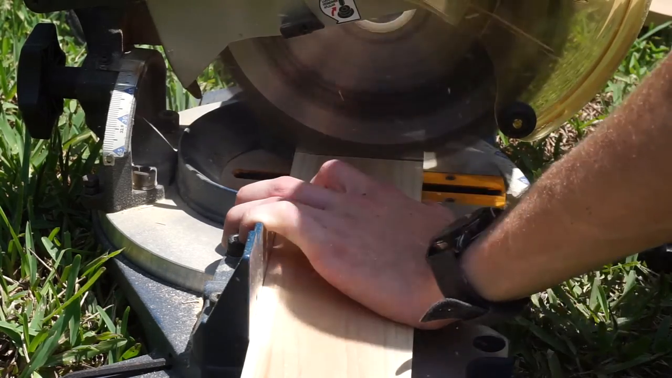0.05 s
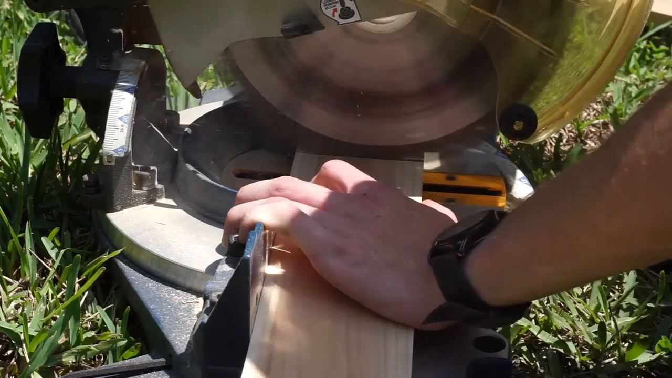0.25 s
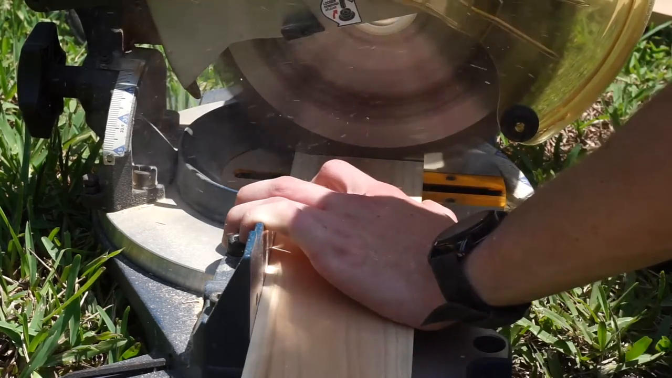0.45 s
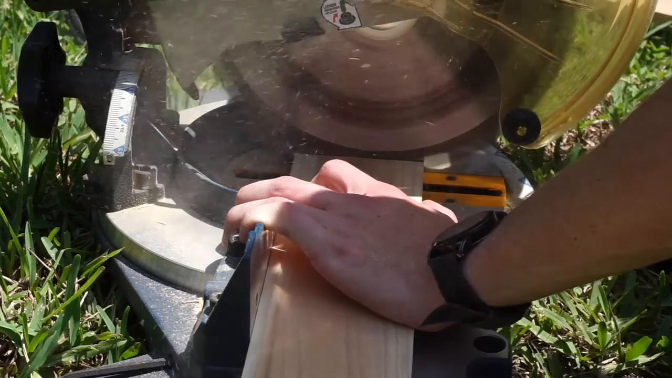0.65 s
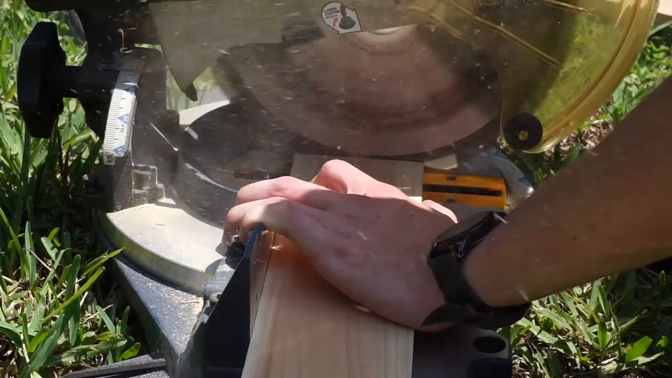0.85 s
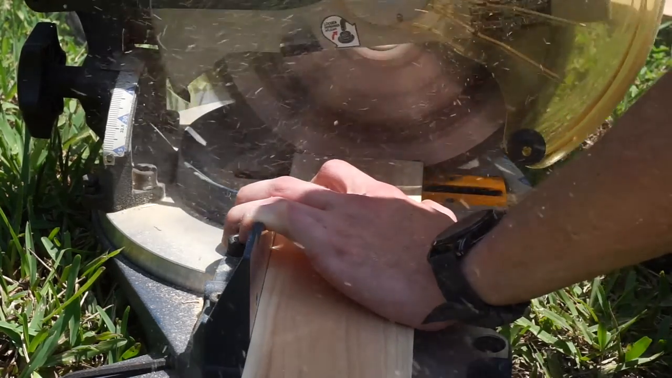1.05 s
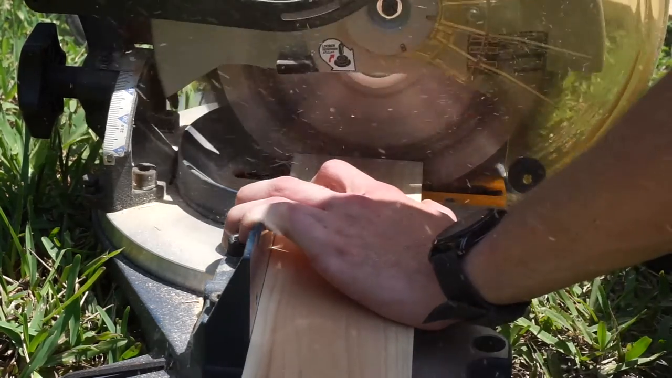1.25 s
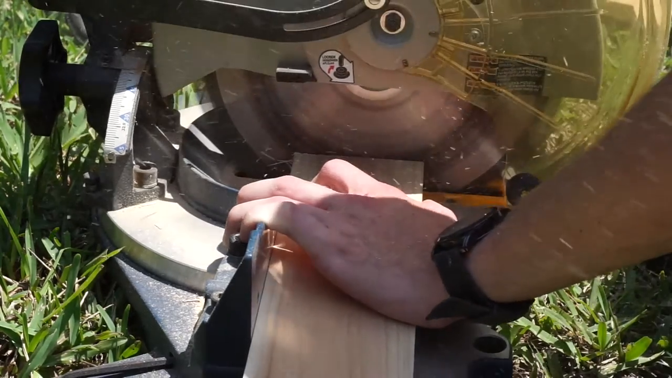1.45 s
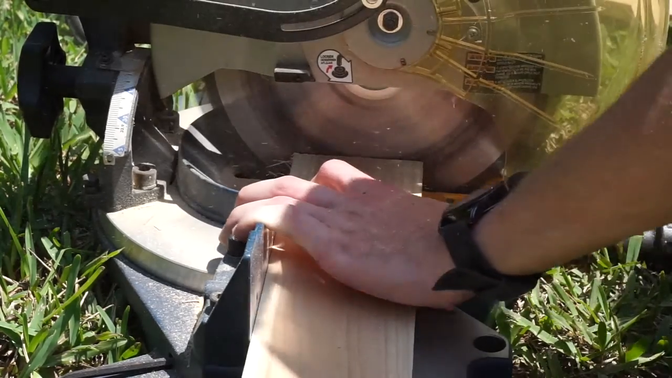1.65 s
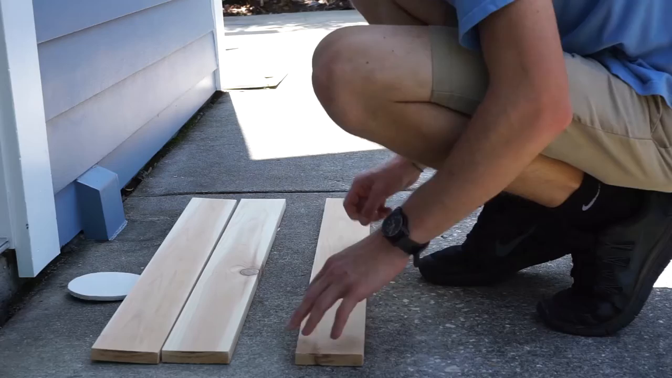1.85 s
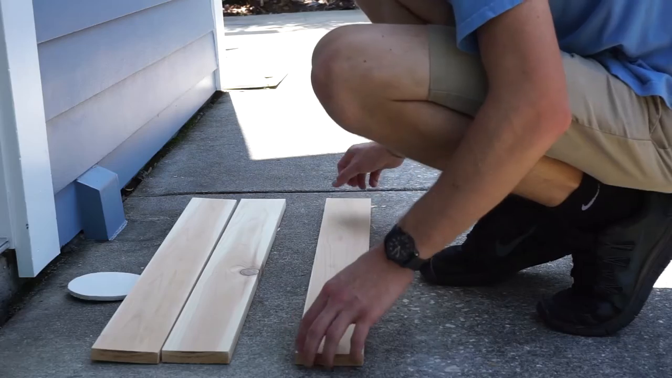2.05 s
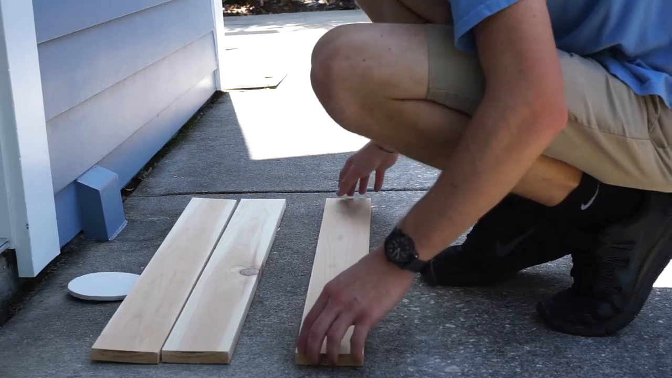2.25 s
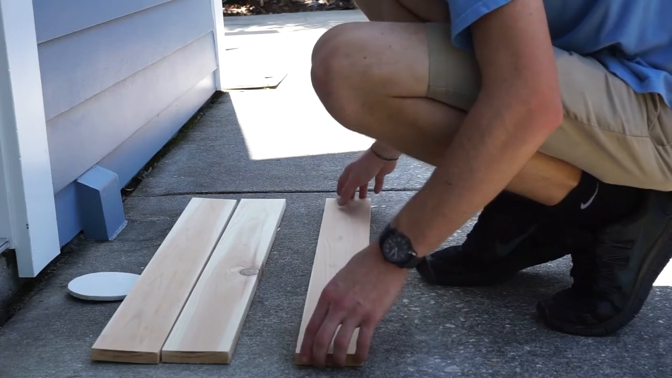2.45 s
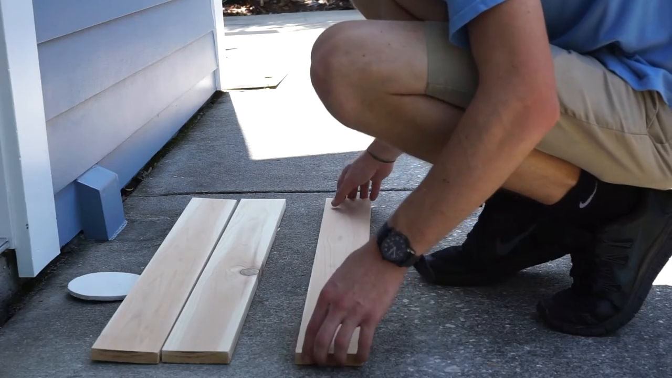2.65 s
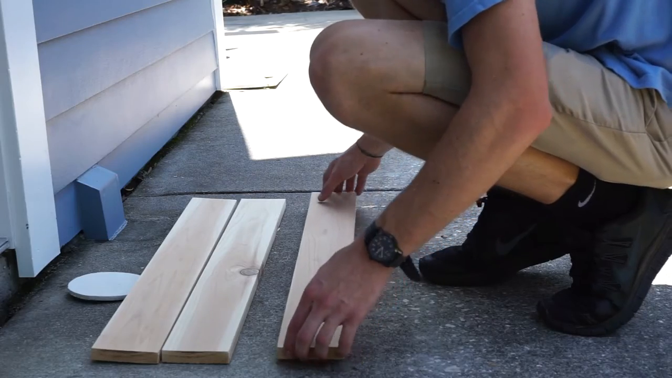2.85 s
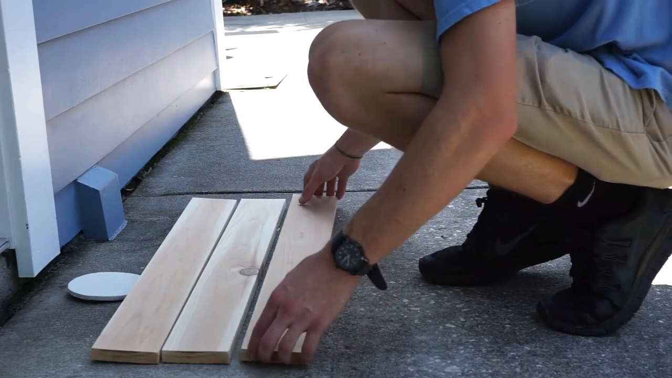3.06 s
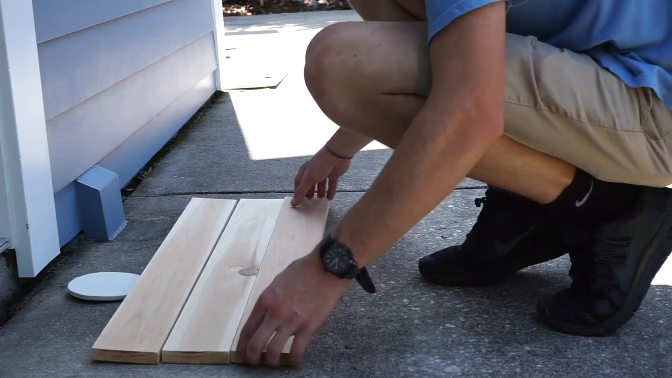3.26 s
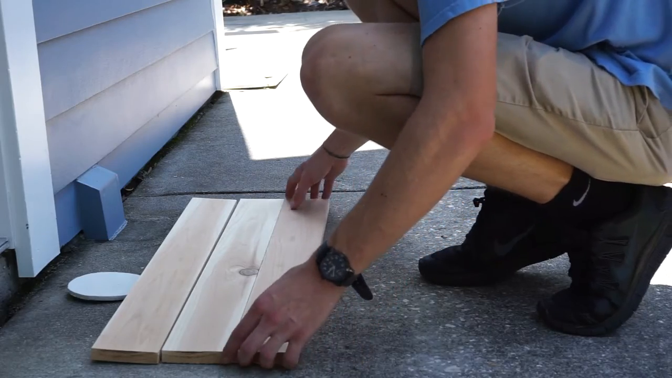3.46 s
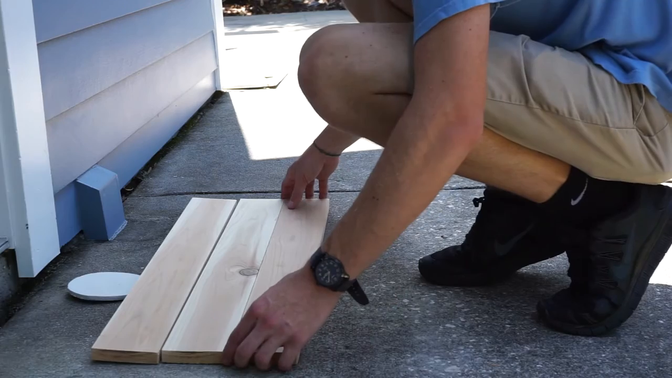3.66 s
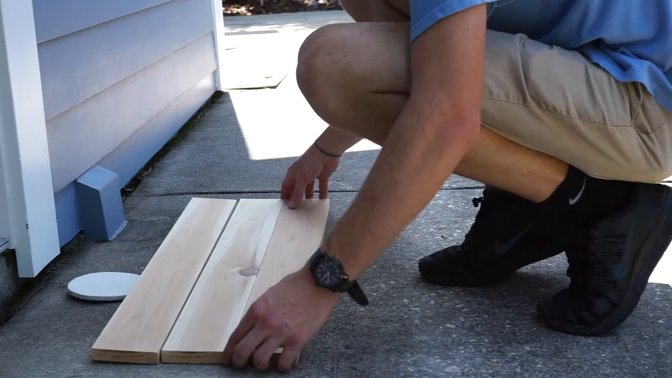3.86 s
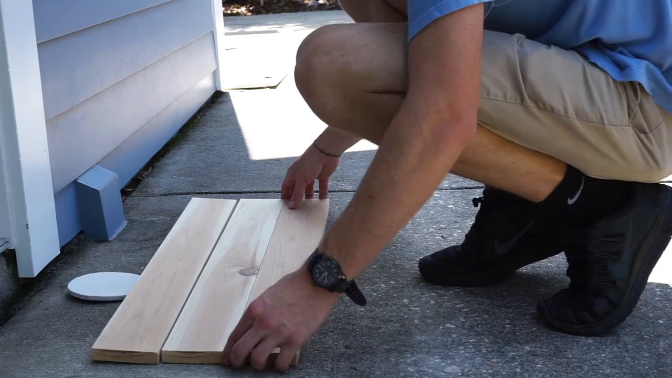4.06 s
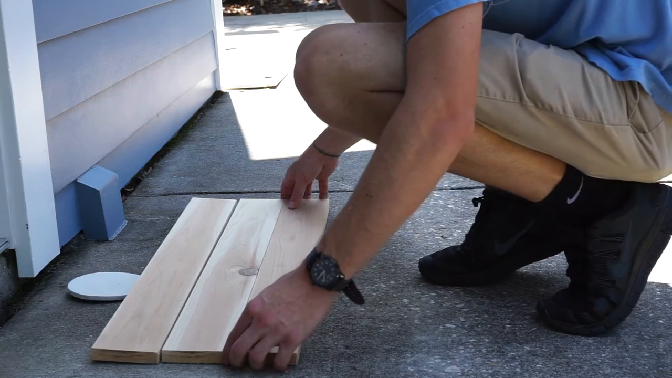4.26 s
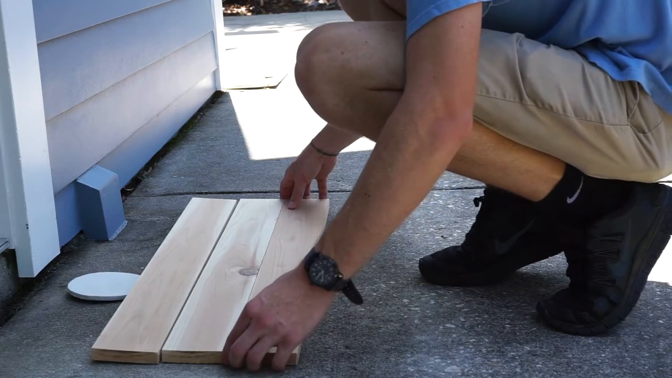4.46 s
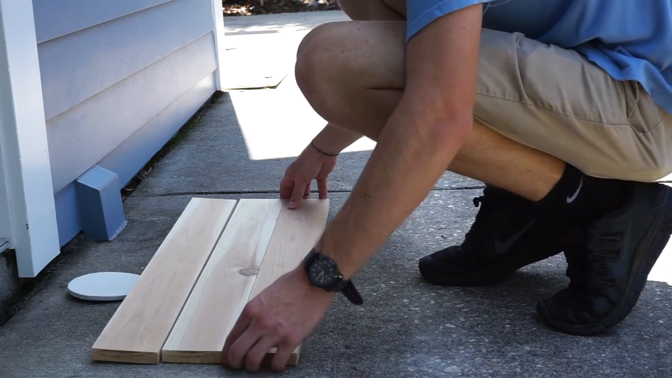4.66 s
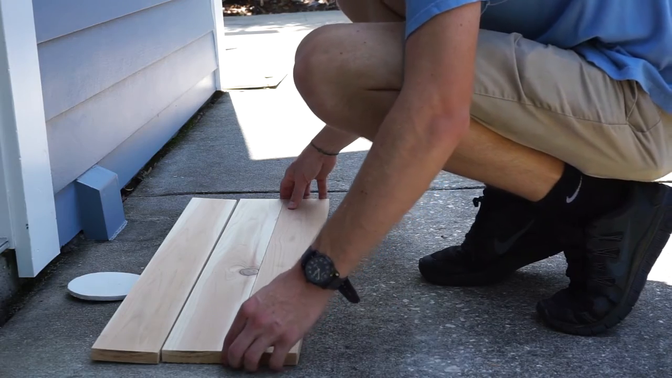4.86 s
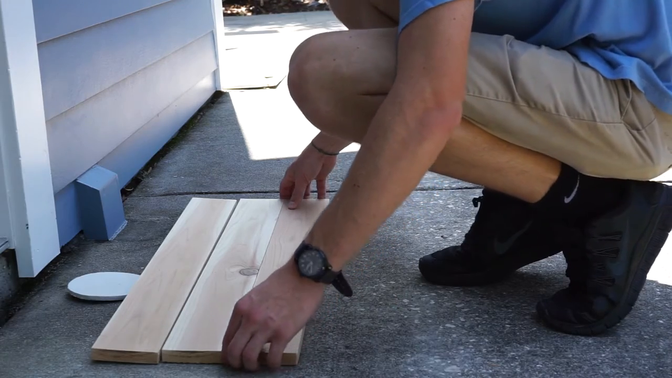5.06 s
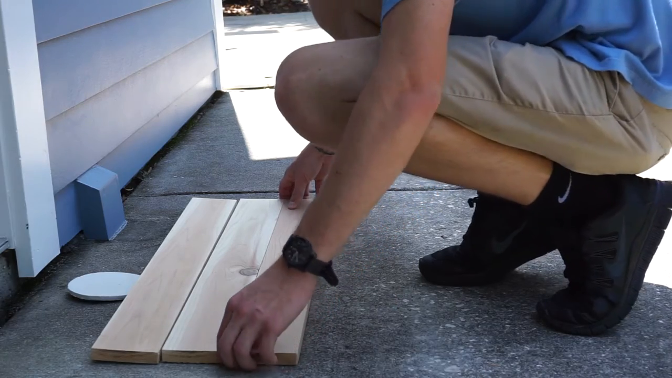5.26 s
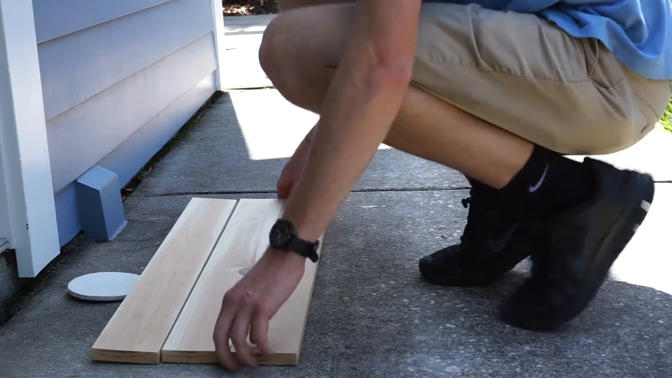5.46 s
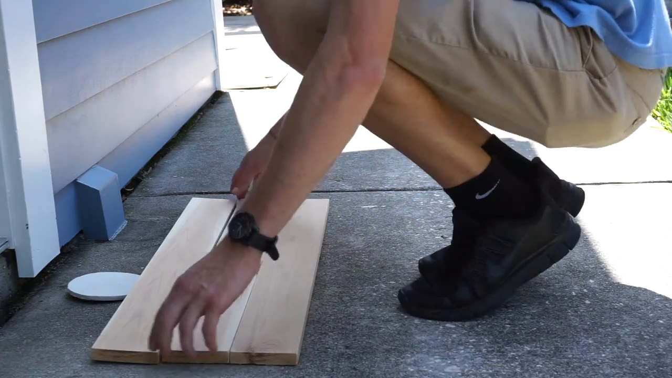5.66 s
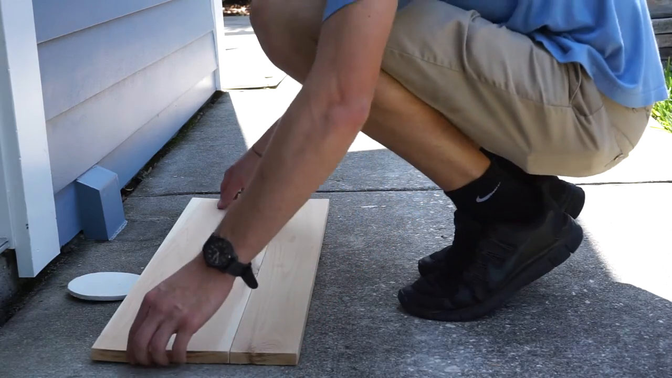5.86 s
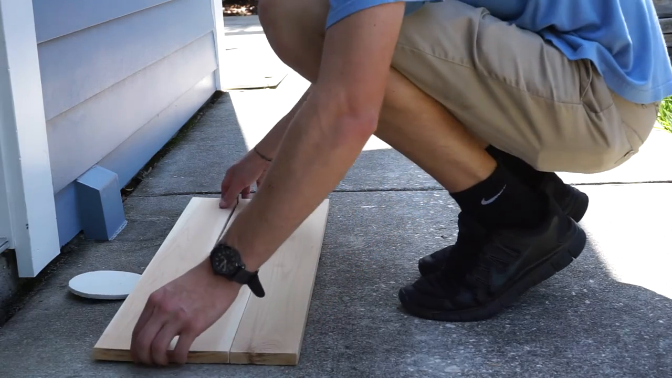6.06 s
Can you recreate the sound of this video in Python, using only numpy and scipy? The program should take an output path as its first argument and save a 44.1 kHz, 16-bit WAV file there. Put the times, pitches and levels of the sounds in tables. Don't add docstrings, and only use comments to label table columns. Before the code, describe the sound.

A loud, bright saw fills the first two seconds: buzzing bite into wood, metallic singing, motor roar, then a quickly descending gear whine. It stops abruptly into soft open air beside a house. Birds slur, twitter and trill with light garden echo; wood touches lightly, clacks with small bounces, and later drags grittily over concrete, ending in a sharp tick. Close stereo microphone, with little extreme treble.

```python
import sys
import numpy as np
from scipy import signal
from scipy.fft import rfft, irfft, next_fast_len
from scipy.io import wavfile

SR = 44100
rng = np.random.default_rng(int(sys.argv[2]) if len(sys.argv) > 2 else 0)


def store_pcm(level_fs):
    pcm = np.round(np.clip(level_fs, -1, 1) * 32767).astype(np.int16)
    wavfile.write(sys.argv[1], SR, np.atleast_2d(pcm).T)


def level_to_linear(level):
    exponent = np.asarray(level, float) / 20
    return 10 ** exponent


N = 269892
NOW_S = np.arange(N) / SR
SAW_ENDS_S = 1.903


def rms_one(x):
    return x / np.sqrt(np.mean(x ** 2) + 1e-20)


def in_time(rows):
    s, *columns = np.transpose(rows)
    return [np.interp(NOW_S, s, c) for c in columns]


def sounding(rows, fade_s=0.016):
    inside_s = np.minimum(NOW_S - rows[0][0], rows[-1][0] - NOW_S)
    return np.clip(inside_s / fade_s + 1, 0, 1)


def at_hz(points, hz):
    corner_hz, value = np.transpose(points)
    return np.interp(np.log(np.clip(hz, 1, 11000)), np.log(corner_hz), value)


def colour(x, spectrum):
    size = next_fast_len(N)
    gain = level_to_linear(at_hz(spectrum, np.fft.rfftfreq(size, 1 / SR)))
    return rms_one(irfft(rfft(x, size) * gain, size)[..., :N])


def drift(rate_hz):
    r = np.exp(-40 * np.pi * rate_hz / SR)
    slow = signal.lfilter([1], [1, -2 * r, r * r], rng.standard_normal(N // 20 + 3002))[3000:]
    return np.interp(np.arange(N) / 20, np.arange(len(slow)), rms_one(slow))


def resonate(x, modes, flicker_db=None):
    out = np.zeros(N)
    for k, (hz, width_hz, level_db) in enumerate(modes):
        r = np.exp(-np.pi * width_hz / SR)
        poles = [1, -2 * r * np.cos(2 * np.pi * hz / SR), r * r]
        rung = signal.lfilter([1, 0, -1], poles, x + 1e-18)
        if flicker_db:
            level_db = level_db + flicker_db * drift(3.6)
        out += (-1) ** k * (1 - r * r) / 2 * level_to_linear(level_db) * rung
    return out


def singing(chips, modes):
    out = np.zeros(N)
    for hz, width_hz, level_db, loudest_s, spread_s in modes:
        swell = level_to_linear(level_db) * np.exp(-((NOW_S - loudest_s) / spread_s) ** 2)
        rung = rms_one(resonate(chips, [(hz, 1.2 * width_hz, 0)]))
        out += swell * rung * level_to_linear(1.8 * drift(12) - 1.5)
    return out


def lift_db(hz, peaks):
    lift = sum(level_to_linear(2 * gain_db) / (1 + (2 * (hz - peak_hz) / width_hz) ** 2) ** 2
               for peak_hz, width_hz, gain_db in peaks)
    return 10 * np.log10(1 + lift)


def tone(hz, level_db, wobble_rad=.3, wobble_hz=40):
    phase = 2 * np.pi * np.cumsum(hz) / SR + wobble_rad * drift(wobble_hz)
    return np.sqrt(2) * level_to_linear(level_db) * np.sin(phase)


def echoes(x, t60_s, start_s):
    t = np.arange(int(SR * t60_s)) / SR
    tails = rng.standard_normal((2, len(t))) * level_to_linear(-60 * t / t60_s) * (t > start_s)
    tails = tails / np.sqrt(np.sum(tails ** 2, axis=1, keepdims=True))
    return signal.fftconvolve(x[None], tails, axes=1)[:, :N]


# time_s, tooth_rate_hz
BLADE = [
    (0, 2008),
    (.1, 2000),
    (.33, 1934),
    (.6, 1855),
    (.82, 1773),
    (.95, 1750),
    (1.12, 1748),
    (1.2, 1823),
]
# freq_hz, level_db
CUT_COLOUR = [(300, -53), (450, -34.5), (700, -1.5), (1200, -4.5), (2000, -8), (3200, -11), (4500, -10.5),
              (6500, 0.5), (9000, 3.5), (10600, 5.5), (11200, -5.5)]
# freq_hz, width_hz, level_db, loudest_s, spread_s
BLADE_MODES = [(690, 70, -39.5, .1, .15), (673.5, 16, -40, 0.82, 0.4), (880, 15, -48.5, 1.01, 0.071),
               (1086, 21, -39.5, 1.15, 0.22), (1388, 7.9, -44, 0.94, 0.067), (2000, 11, -40, 1.23, 0.17),
               (2150, 17, -38, 0.32, 0.33), (2170, 30, -35.5, 0.825, 0.18), (2520, 20, -41, 0.474, 0.065),
               (2800, 16, -37.5, 1.087, 0.21), (3645, 13, -33.5, 1.19, 0.17), (3720, 20, -36, 1.1, 0.18),
               (4650, 450, -35, 1.27, 0.17), (4404, 38, -45, 0.54, .3)]
# freq_hz, width_hz, level_db, loudest_s, spread_s
RIM_MODES = [(5680, 21, -30, 1.2, 0.15), (6520, 37, -37, 0.14, 0.15), (6580, 24, -35, 0.82, 0.26),
             (7100, 18, -33, 1.005, 0.13), (7420, 30, -38, 0.62, 0.29), (7860, 30, -29.5, 0.796, .06),
             (8280, 28, -32, 0.86, 0.2), (8883, 31, -32.5, 0.93, 0.2), (9930, 25, -32, 0.76, .12),
             (10000, 14, -37, 0.44, 0.156), (10600, 40, -33.5, 0.44, 0.2), (10700, 15, -27, 0.12, 0.21),
             (10550, 15, -31, 0.94, .13), (10830, 100, -32, 0.56, .4)]
TOOTH_TONE_DB = (-41, -41, -42)
# freq_hz, width_hz, gain_db
GUARD = [(2003, 24, 9), (1921, 36, 17), (1848, 70, 16.5), (1750, 24, 6), (3970, 160, 6), (3806, 80, 7.5),
         (3526, 44, 13), (5900, 250, 8), (5650, 300, 8), (5307, 200, 8.5)]


def teeth():
    tooth_count = 24
    lift_s, breakout_s, tone_loss_db_per_s = 1.118, .955, 45
    bite_db, feed_swing_db = -24, 1.5
    hz, = in_time(BLADE)
    passed = np.cumsum(hz) / SR
    cutting = sounding([(-1,), (lift_s,)], 0.01)

    index = np.arange(int(passed[-1]) - 1)
    place, bite_force = rng.standard_normal((2, tooth_count))[:, index % tooth_count]
    at = np.clip(np.interp(index + 0.267 * place, passed, np.arange(N)), 0, N - 2)
    whole = at.astype(int)
    force = bite_force + .25 * rng.standard_normal(len(index))
    strikes = np.zeros(N)
    np.add.at(strikes, whole, force * (1 - at + whole))
    np.add.at(strikes, whole + 1, force * (at - whole))
    chips = rms_one(strikes) + .45 * rng.standard_normal(N)
    bite = level_to_linear(bite_db + feed_swing_db * drift(3.0)) * colour(chips, CUT_COLOUR) * cutting

    runout = level_to_linear(1.8 * drift(9)) * (1 + .32 * np.sin(2 * np.pi * passed / tooth_count))
    loss_db = tone_loss_db_per_s * np.maximum(NOW_S - breakout_s, 0)
    lines = np.zeros(N)
    for k, level_db in enumerate(TOOTH_TONE_DB, 1):
        line_db = level_db + lift_db(k * hz, GUARD) - k * loss_db + 1.6 * drift(17)
        lines += tone(k * hz, line_db, .2 * k)

    feed = chips + .9 * rng.standard_normal(N)
    armature = tone(.2062 * hz, -49.5) * sounding([(0.44,), (0.96,)], 0.098) ** 2
    rim = cutting * (singing(feed, RIM_MODES) + runout * lines)
    return bite + singing(feed, BLADE_MODES) + rim + armature


# time_s, level_db
ROAR = [
    (0, -21.5),
    (.16, -25),
    (.22, -31),
    (.76, -35),
    (1.12, -27),
    (1.4, -24.5),
    (1.47, -26),
    (1.85, -46),
    (1.9, -45),
]
# freq_hz, level_db
ROAR_COLOUR = [(35, -100), (60, -73.5), (456, -11.5), (646, -3.5), (999, 3.5), (1300, -9.5), (1510, -0.5),
               (1800, -3.5), (3620, -3.5), (5840, -5), (7270, -3.5), (11000, -11.5), (14300, -48),
               (22000, -120)]
# freq_hz, level_db
SLOW_COLOUR = [(60, -55), (170, -58), (500, -16), (680, -4), (1000, 4), (1300, -8), (1700, 0.5),
               (2400, -4.5), (3900, -10), (4400, -16), (5500, -21.5), (6100, -5), (6700, -14.5),
               (11000, -18.5)]
# freq_hz, width_hz, level_db
HOUSING_MODES = [(682, 36, 4), (1020, 67, -6.5), (1420, 73, 1), (1840, 36, -14.5), (2380, 269, -1),
                 (2800, 25, -10.5), (3750, 48, -6), (4100, 600, -6), (6300, 120, -19.5), (7280, 140, -22)]
# freq_hz, width_hz, gain_db
GEARCASE = [(3200, 500, 8), (2290, 560, 11.5), (1630, 540, 11), (940, 130, 6), (680, 60, 15)]


def motor():
    usual_roar_db, dulls_db_per_octave_per_db = -30, 0.1364
    housing_db, housing_follows = -37, .5
    brake_s, slowing_s, whine_from_hz, whine_to_hz = 1.44, .234, 2430, 349.7
    upper_line = 1.74
    roar_db, = in_time(ROAR)
    swing_db = roar_db - usual_roar_db

    slowed_rad = np.interp(NOW_S, [1.47, 1.62], [0, np.pi / 2])
    air = np.cos(slowed_rad) * colour(rng.standard_normal(N), ROAR_COLOUR)
    air = air + np.sin(slowed_rad) * colour(rng.standard_normal(N), SLOW_COLOUR)
    roar = np.zeros(N)
    for octave in range(4):
        lowpass = signal.butter(2, 1400 * 2 ** octave, fs=SR, output="sos")
        low = signal.sosfilt(lowpass, air)
        roar += low * level_to_linear(-dulls_db_per_octave_per_db * swing_db * octave + 0.92 * drift(16))
        air = air - low
    housing = rms_one(resonate(rng.standard_normal(N), HOUSING_MODES, flicker_db=1.5))
    housing = level_to_linear(housing_db + housing_follows * swing_db) * housing

    braked_s = np.maximum(NOW_S - brake_s, 0)
    hz = whine_to_hz + (whine_from_hz - whine_to_hz) * np.exp(-braked_s / slowing_s)
    whine_db = -39 - 26 * braked_s
    upper_db = whine_db - 3 - 12.0 * braked_s + lift_db(upper_line * hz, GEARCASE)
    whine = tone(hz, whine_db + lift_db(hz, GEARCASE) + 1.5 * drift(35), .8, 60)
    whine += tone(upper_line * hz, upper_db, 1.3, 61)
    whine += tone(2.8 * hz, whine_db - 5, 2.9, 80)
    return level_to_linear(roar_db) * roar + housing + whine * np.clip(braked_s / 0.017, 0, 1)


def saw():
    near = teeth() + motor()
    bright = signal.butter(3, 1750, "high", fs=SR, output="sos")
    reflections = signal.sosfilt(bright, echoes(near, .3, 0.0014))
    wide = near * level_to_linear([[-.6], [.6]]) + level_to_linear(-4.0) * reflections
    wide = .8 * np.tanh(wide / .8)
    wide = signal.sosfilt(signal.butter(3, 260, "high", fs=SR, output="sos"), wide)
    rumble = signal.sosfilt(signal.butter(2, 150, fs=SR, output="sos"), rng.standard_normal(N))
    wide = wide + level_to_linear(-69) * rumble
    return wide * np.clip((SAW_ENDS_S - NOW_S) / .002, 0, 1)


# time_s, grit_db
DRAG = [
    (5.455, -56),
    (5.476, -43),
    (5.49, -28),
    (5.53, -24),
    (5.575, -29.5),
    (5.607, -24.5),
    (5.645, -31.5),
    (5.662, -42),
    (5.725, -53),
]
# loudest_s, level_db, rise_s, fall_s
SHUFFLE = [
    (2.228, -48.5, .006, .045),
    (2.777, -50.5, .005, .035),
    (3.2, -56, .2, 0.26),
    (3.314, -52.5, .04, 0.1),
    (3.414, -60, .02, 0),
    (4.632, -61, .02, 0.4),
    (5.468, -40, .003, .012),
    (6.066, -48.5, 0.06, .09),
]
# freq_hz, level_db
DRAG_COLOUR = [(250, -38), (560, -10.5), (720, -3), (880, -2), (1080, -13), (1600, -6), (3000, -7.5),
               (5200, -7.5), (7000, -12.5), (11000, -9.5)]
# freq_hz, width_hz, level_db
BOARD = [(1350, 260, -3), (1620, 260, 0), (2050, 350, -2), (2550, 350, -2), (2950, 300, -4)]
# time_s, level_db, sharpness_hz
KNOCKS = [
    (3.2205, -31, 1500),
    (3.229, -34.5, 800),
    (3.2365, -32.5, 890),
    (3.262, -39, 800),
    (3.303, -42, 1500),
]
# freq_hz, width_hz, level_db
EDGE = [(526, 35, -4), (691, 24, 1.5), (890, 55, -16), (1296, 47, -8), (2070, 42, -4), (2480, 44, -0.5)]
# time_s, level_db
TICKS = [
    (2.23, -49),
    (2.778, -48),
    (6.062, -31),
]


def boards():
    ring_rise_db, ring_loss_db_per_s, loose_s = 1.5, 70, 5.49
    grains = rng.random(N) < 11000 / SR
    grain_db = 2.4 * np.minimum(rng.exponential(1, N), 4)
    grit = grains * level_to_linear(grain_db) * rng.choice([-1, 1], N)
    grit_db, = in_time(DRAG)
    ring_db = grit_db + ring_rise_db - ring_loss_db_per_s * np.abs(NOW_S - loose_s)
    slab = level_to_linear(-20) * rms_one(resonate(grit, [(850, 200, 0)]))
    body = rms_one(resonate(grit[::-1], BOARD, flicker_db=1.5))
    push = level_to_linear(grit_db) * (colour(grit, DRAG_COLOUR) + slab) + level_to_linear(ring_db) * body
    out = push * level_to_linear(1.4 * drift(90)) * sounding(DRAG, 0.037)

    light = colour(grit, [(500, -14), (1400, 6), (2200, 6.0), (5000, -2), (8000, -10.5), (11000, -4)])
    for loudest_s, level_db, rise_s, fall_s in SHUFFLE:
        with np.errstate(divide="ignore", invalid="ignore"):
            away = np.maximum((loudest_s - NOW_S) / rise_s, (NOW_S - loudest_s) / fall_s if fall_s else
                              np.where(NOW_S > loudest_s, np.inf, -np.inf))
        out += light * level_to_linear(level_db + 3.0 - 20 * away)

    blows, t = np.zeros(N), np.arange(400) / SR
    for start_s, level_db, sharp_hz in KNOCKS:
        click = sharp_hz ** 2 * t / 5 * np.exp(-2 * np.pi * sharp_hz * t)
        blows[int(start_s * SR):][:400] += level_to_linear(level_db) * click
    out += resonate(blows, EDGE)
    for start_s, level_db in TICKS:
        tick = np.diff(rng.standard_normal(401)) * np.exp(-t / 0.0012)
        out[int(start_s * SR):][:400] += level_to_linear(level_db) * tick
    return out * level_to_linear([[-1.7], [1.7]]) + level_to_linear(-9) * echoes(out, .12, .002)


# start_s, level_db, slur_low_hz, twitter_delay_s, twitter_low_hz
SONG = [
    (2.285, -48.5, 2735, 0.092, 3280),
    (2.519, -48, 2710, 0.13, 3050),
    (2.813, -48, 2700, 0.12, 3100),
    (3.759, -48, 2716, .108, 2950),
    (4.005, -47, 2530, 0.13, 3100),
]
# delay_s, length_s, from_height, to_height, level_db
TWITTER = [
    (-.04, .04, -.8, -.1, -8),
    (0, .032, .98, .02, 0),
    (.036, .034, .9, .1, -1.5),
    (.08, .04, .6, .2, -9.5),
]
# start_s, level_db
CHIPS = [
    (2.852, -54),
    (5.07, -59),
]


def whistles():
    twitter_top_hz = 3660
    notes = [(s, .008, 6000, 4750, db) for s, db in CHIPS]
    for start_s, level_db, slur_low_hz, wait_s, low_hz in SONG:
        notes.append((start_s, .075, 3580, slur_low_hz, level_db))
        span_hz = twitter_top_hz - low_hz
        for after_s, length_s, high, low, less_db in TWITTER:
            notes.append((start_s + wait_s + after_s, length_s, low_hz + high * span_hz,
                          low_hz + low * span_hz, level_db + less_db))
    song = np.zeros(N)
    for start_s, length_s, from_hz, to_hz, level_db in notes:
        u = np.linspace(0, 1, int(length_s * SR))
        glide_hz = to_hz + (from_hz - to_hz) * (1 - u) ** 1.2
        waver_hz = 110 * np.sin(2 * np.pi * 75 * u * length_s)
        phase = 2 * np.pi * np.cumsum(glide_hz + waver_hz) / SR
        swell = np.sin(np.pi * u ** 1.25) ** 0.4
        song[int(start_s * SR):][:len(u)] += level_to_linear(level_db) * swell * np.sin(phase)
    return song * level_to_linear(1.8 * drift(60))


# start_s, length_s, centre_hz, level_db
TRILL = [
    (4.649, 0.38, 3020, -58),
    (5.05, .24, 2900, -57),
    (5.329, 0.091, 2730, -54),
    (5.7, .1, 3050, -61),
    (5.869, .1, 3106, -57),
    (6.001, 0.1, 3150, -57.5),
]


def trilling():
    sweep = (28 * NOW_S + 0.343 * drift(5.7)) % 1
    warble_hz = 520 * (.5 - sweep) + 90 * drift(60)
    bursts = np.zeros(N)
    for start_s, length_s, centre_hz, level_db in TRILL:
        sag_hz = 300 * np.clip(NOW_S - start_s, 0, length_s)
        gate = sounding([[start_s + 0.022], [start_s + length_s - .03]], 0.044)
        bursts += tone(centre_hz - sag_hz + warble_hz, level_db) * gate
    return level_to_linear(3.0 * drift(14)) * np.sin(np.pi * sweep) * bursts


# time_s, pitch_hz, level_db
CALL = [
    (5.62, 2480, -50),
    (5.67, 2430, -50),
    (5.73, 2420, -45.5),
    (5.78, 2380, -53),
    (5.85, 2280, -55),
    (5.9, 2270, -52),
    (5.93, 2250, -56),
    (5.98, 2220, -68),
]


def calling():
    call_hz, call_db = in_time(CALL)
    throb = 1 + .6 * np.cos(2 * np.pi * 29.5 * (NOW_S - 5.733))
    overtone = tone(2 * call_hz, call_db - 16, 1.2, 70)
    return throb * (tone(call_hz, call_db) + overtone) * sounding(CALL)


def birds():
    song, trill, call = whistles(), trilling(), calling()
    dull_song = signal.sosfilt(signal.butter(4, 4200, fs=SR, output="sos"), song)
    garden = echoes(1.3 * dull_song + 2.1 * trill + 0.4 * call, .45, 0.003)
    direct = 1.1 * song * level_to_linear([[1], [-1]]) + call * level_to_linear([[-1.5], [1.5]]) + 0.51 * trill
    return direct + level_to_linear(2) * garden


# freq_hz, level_db
PORCH = [(15, -46), (25, -37), (44, -18.5), (81, -25), (116, -2), (146, -13), (428, -5), (581, -8.5),
         (644, -5.5), (1420, -10.5), (2500, -16), (2990, -16), (3960, -21.5), (11300, -31.5), (14700, -65),
         (22000, -120)]
# freq_hz, likeness_0_to_1
PORCH_LIKENESS = [(60, 0.99), (130, 0.95), (270, 0.85), (570, 0.73), (1200, 0.35), (2550, 0.31),
                  (5390, 0.012), (11400, 0.03)]
# freq_hz, width_hz, level_db
HUM = [(59.6, 1.8, -58.5), (114, 9.9, -60), (176, 18, -62.5), (235.4, 8.4, -65.5)]


def porch():
    mid, side = rfft(rng.standard_normal((2, N)))
    alike = np.clip(at_hz(PORCH_LIKENESS, np.fft.rfftfreq(N, 1 / SR)), 0, 1)
    pair = np.sqrt(1 + alike) * mid + np.sqrt(1 - alike) * side * [[1], [-1]]
    air = colour(irfft(pair, N), PORCH)
    hum = np.zeros(N)
    for hz, width_hz, level_db in HUM:
        hum += level_to_linear(level_db) * rms_one(resonate(rng.standard_normal(N), [(hz, width_hz, 0)], flicker_db=2.5))
    return (level_to_linear(-47 + 0.38 * drift(4.3)) * air + hum) * (NOW_S > SAW_ENDS_S)


def scene():
    return saw() + boards() + birds() + porch()


def top_cut(x):
    return signal.sosfilt(signal.butter(12, 12010, fs=SR, output="sos"), x)


def record(dry):
    size = next_fast_len(N + SR // 4)
    keep = np.clip((11170 - np.fft.rfftfreq(size, 1 / SR)) / 120, .0004, 1)
    mix = irfft(rfft(dry, size) * keep, size)[:, :N]
    return top_cut(mix)


dry = scene()
out = record(dry)
store_pcm(out)
```